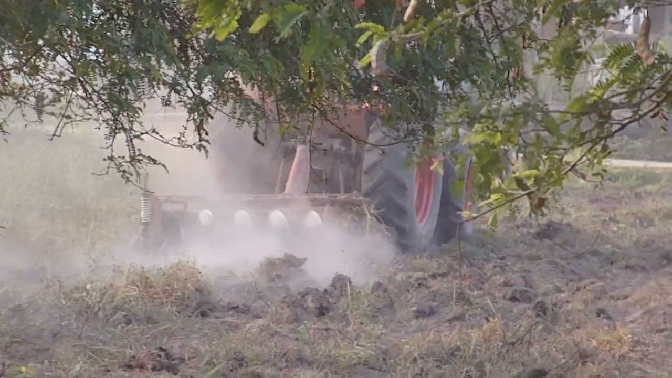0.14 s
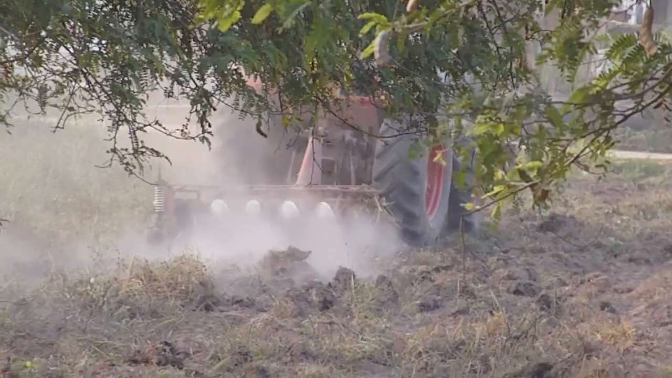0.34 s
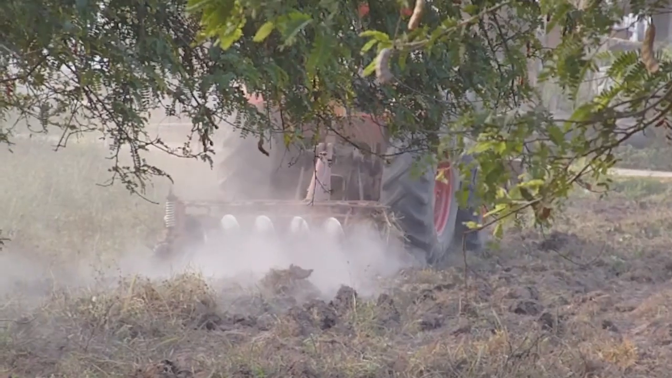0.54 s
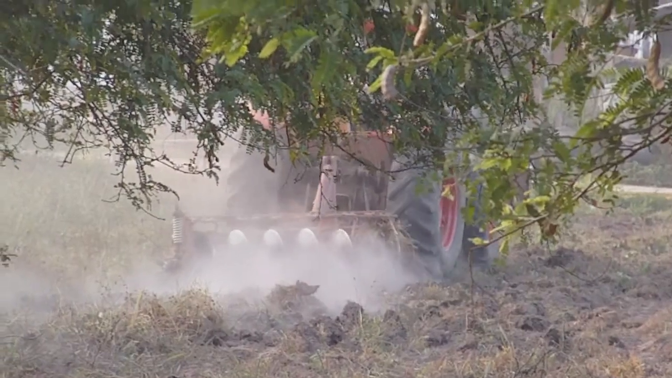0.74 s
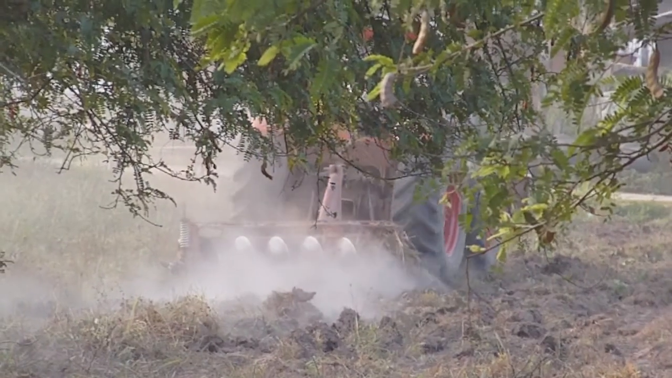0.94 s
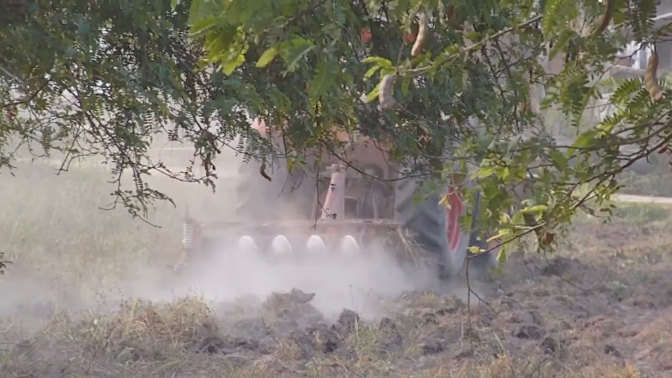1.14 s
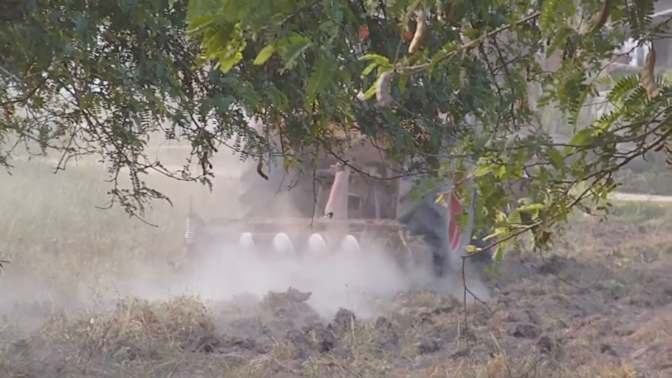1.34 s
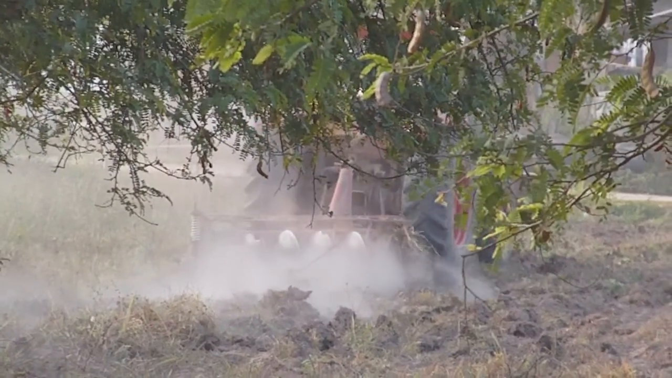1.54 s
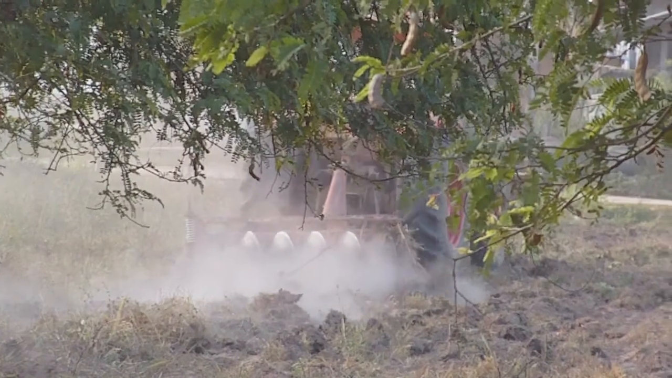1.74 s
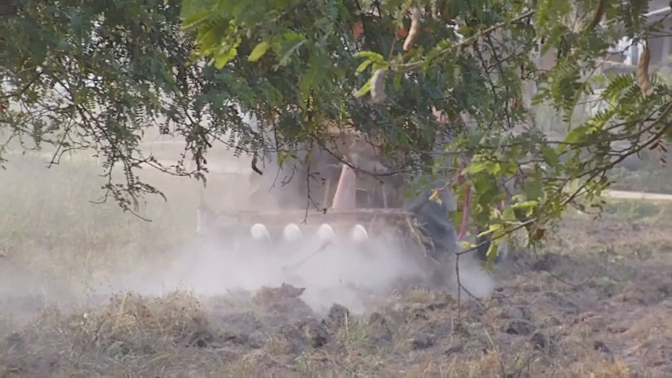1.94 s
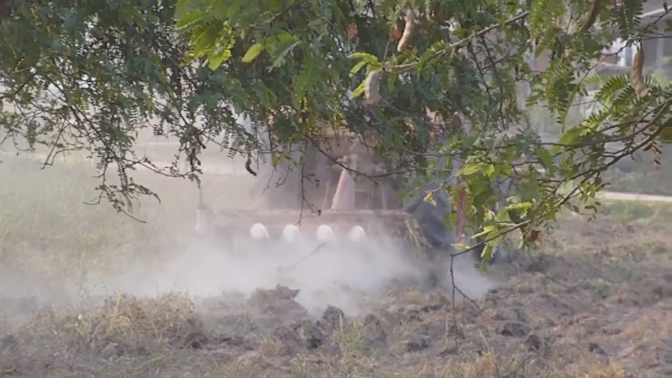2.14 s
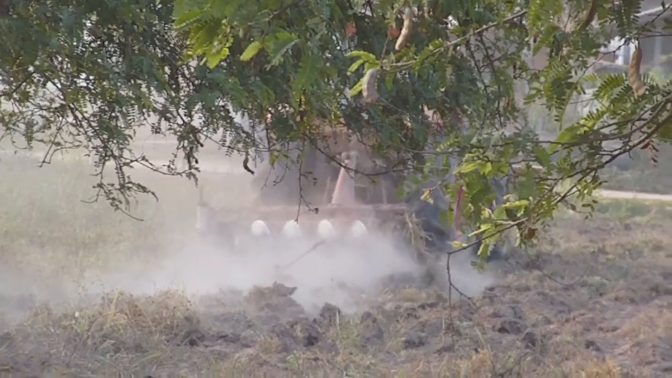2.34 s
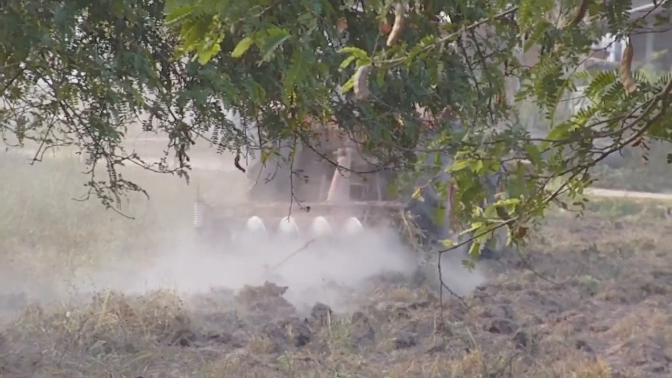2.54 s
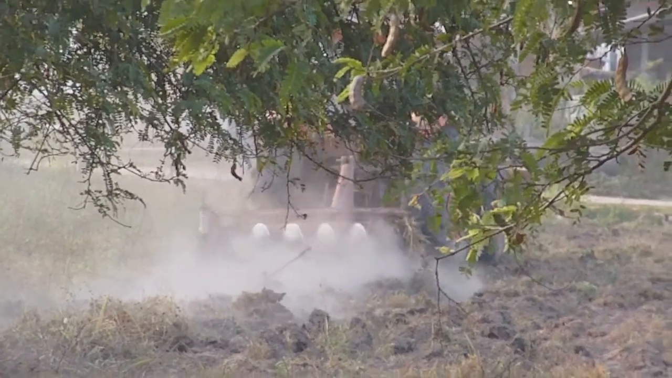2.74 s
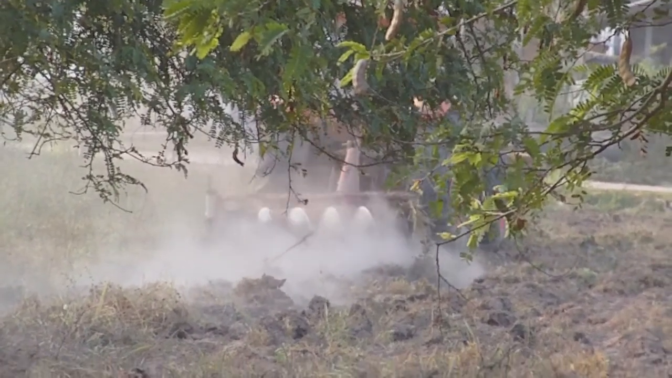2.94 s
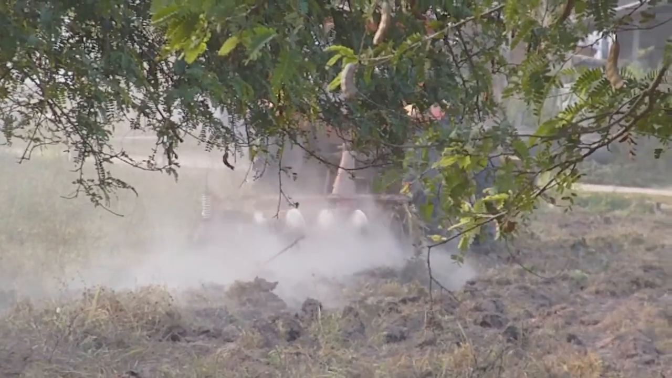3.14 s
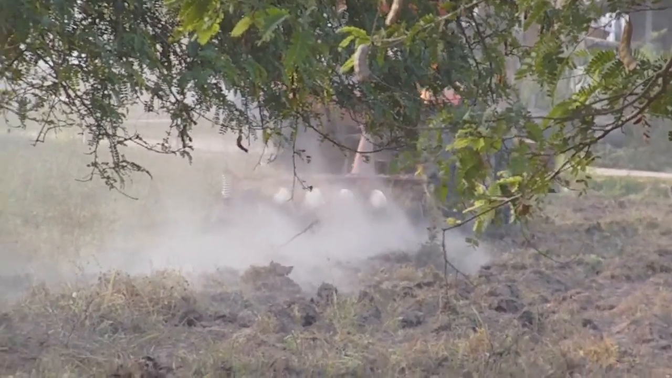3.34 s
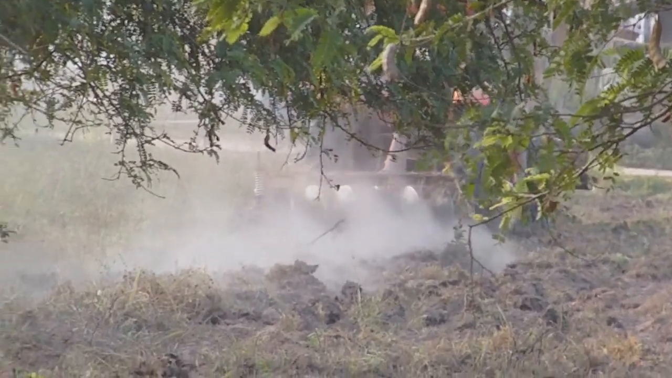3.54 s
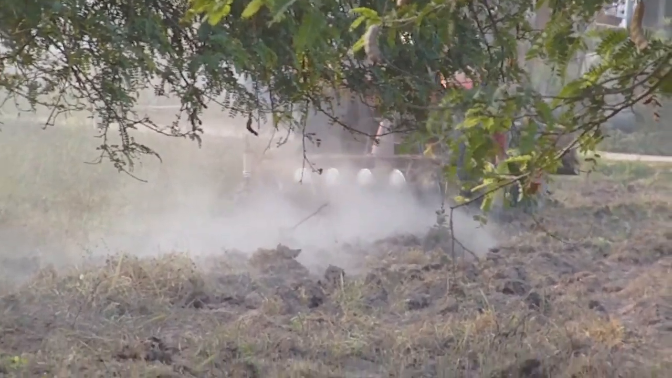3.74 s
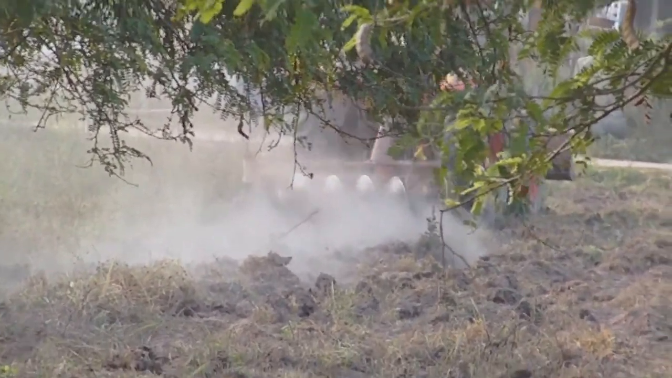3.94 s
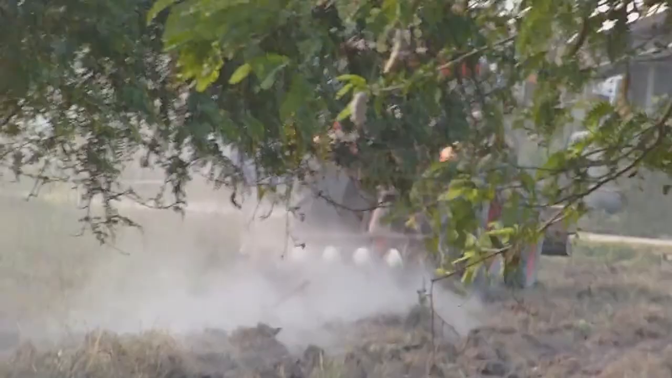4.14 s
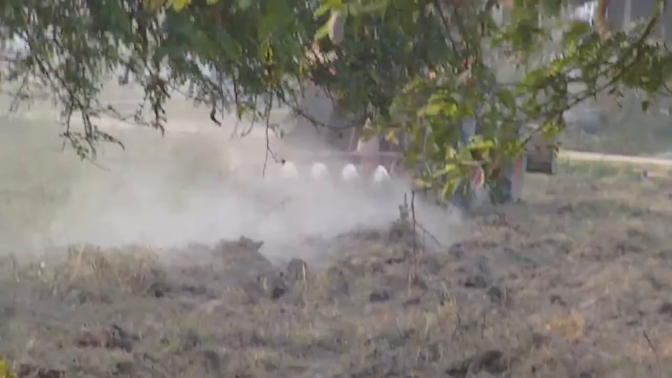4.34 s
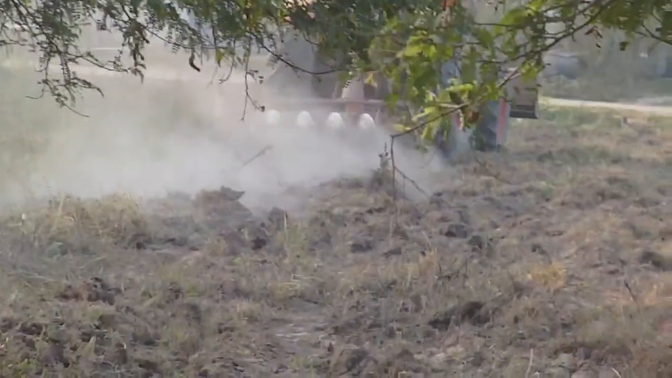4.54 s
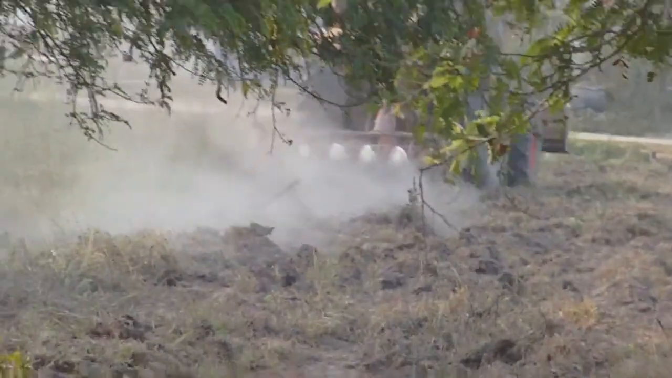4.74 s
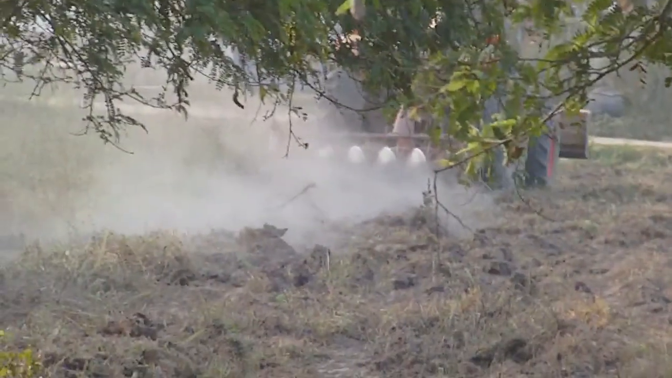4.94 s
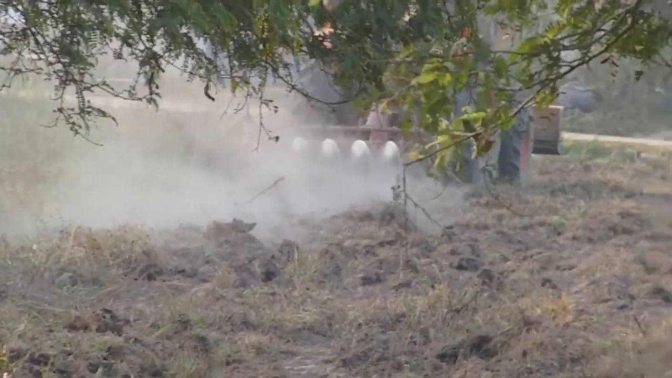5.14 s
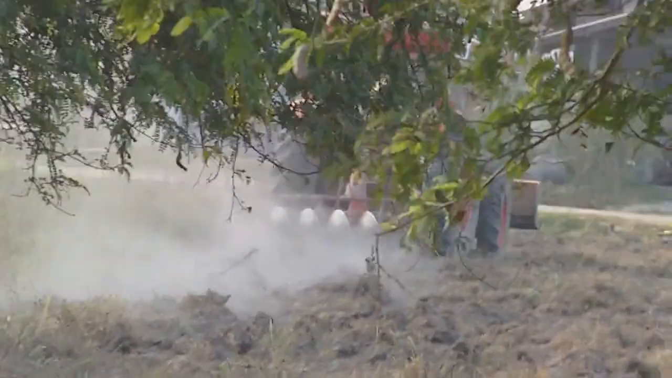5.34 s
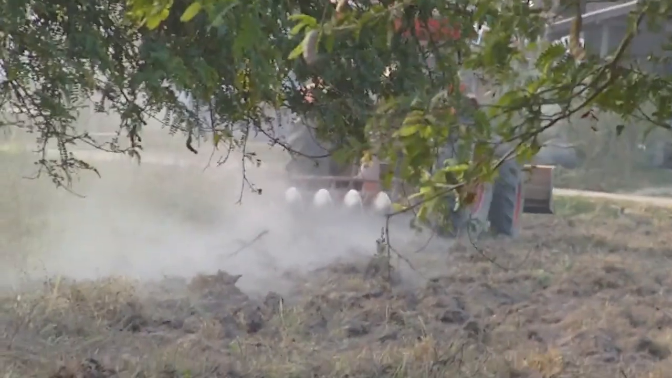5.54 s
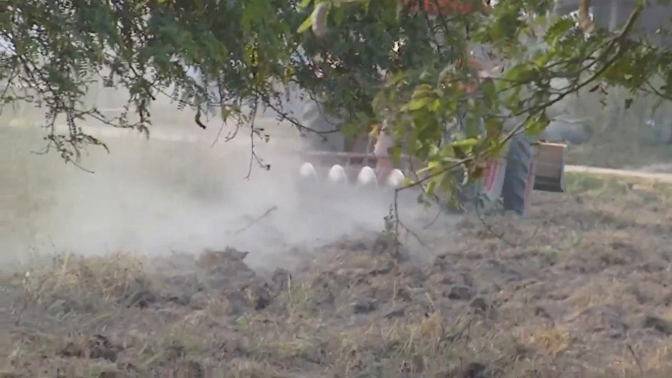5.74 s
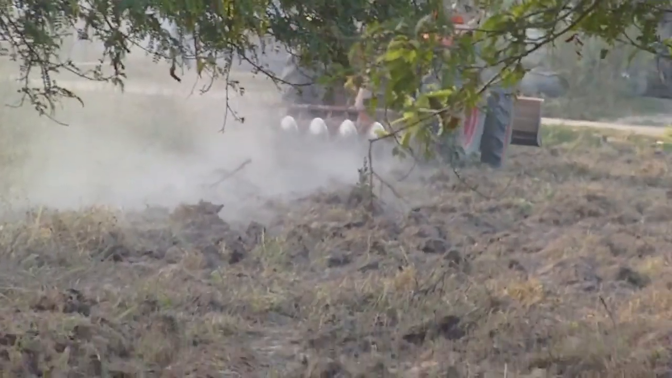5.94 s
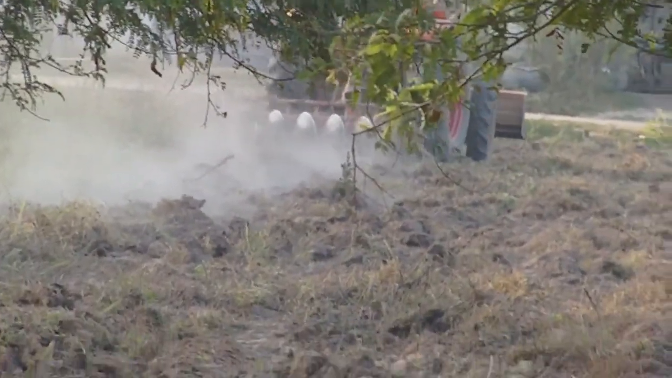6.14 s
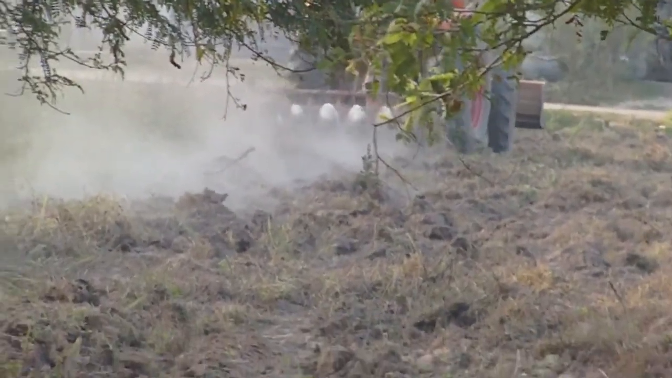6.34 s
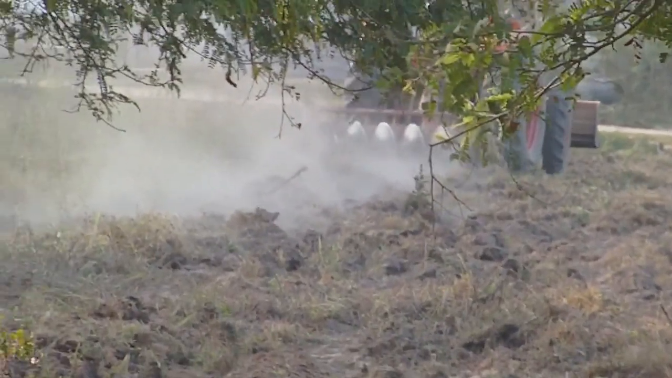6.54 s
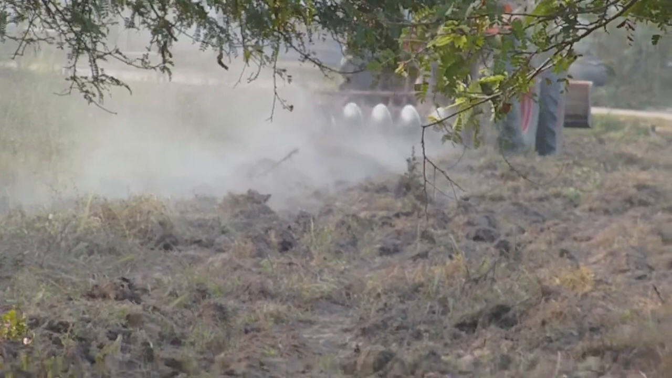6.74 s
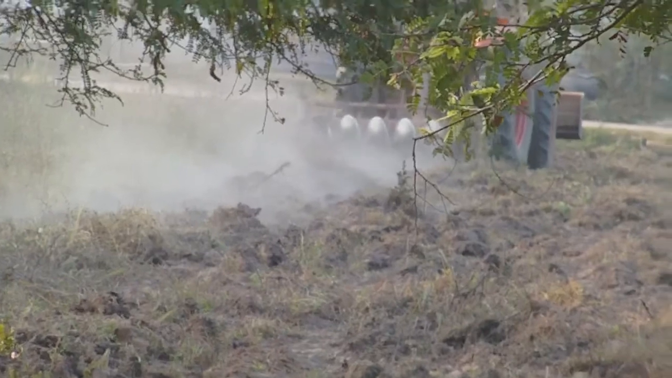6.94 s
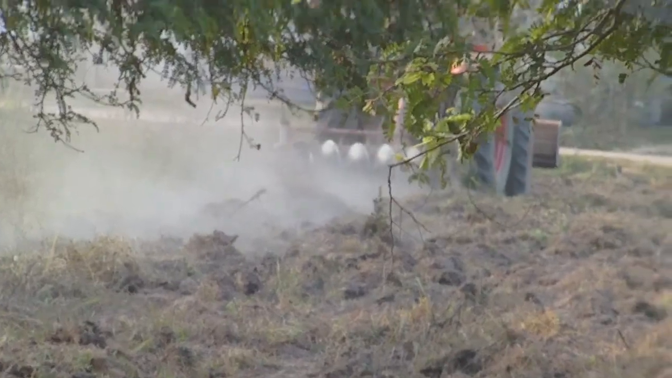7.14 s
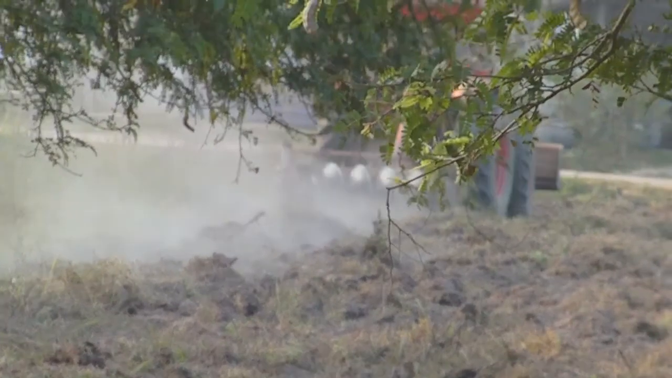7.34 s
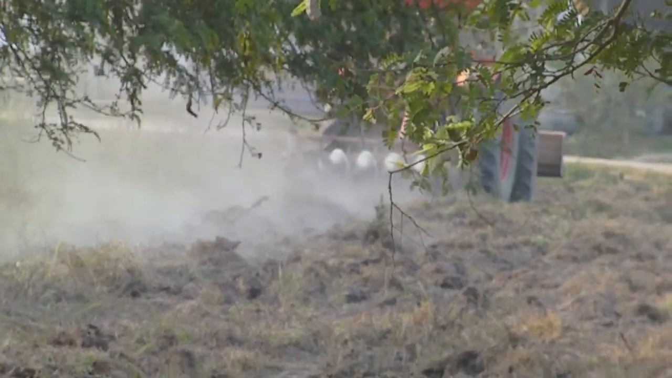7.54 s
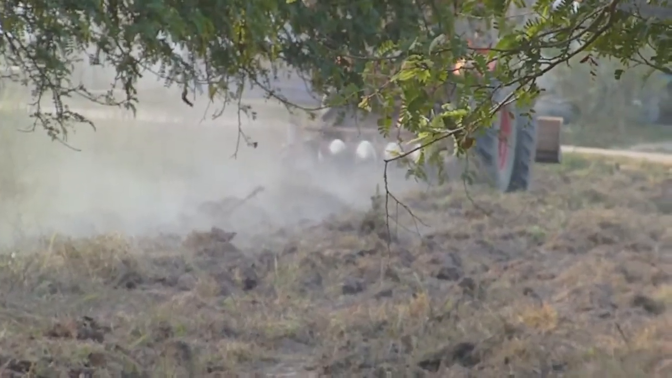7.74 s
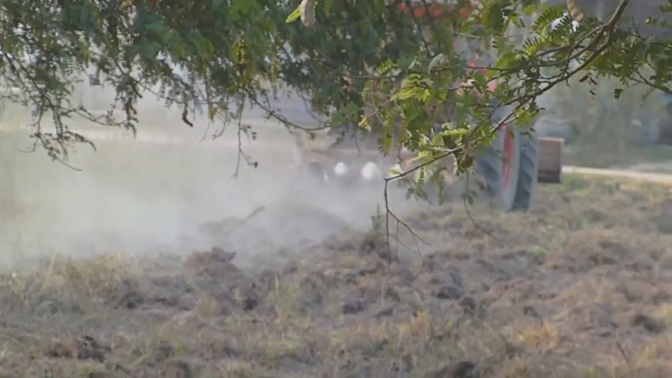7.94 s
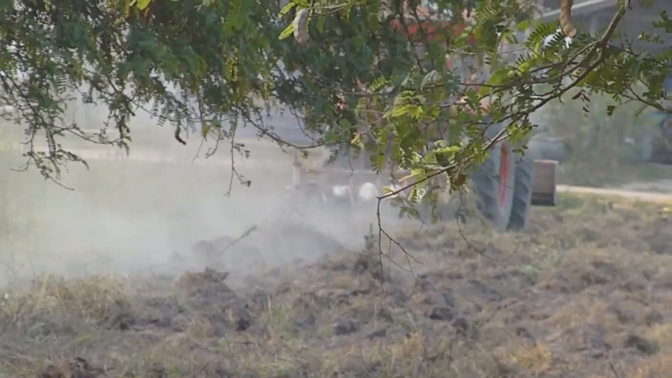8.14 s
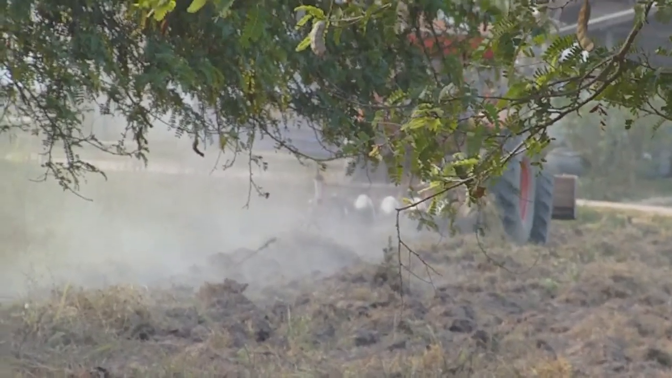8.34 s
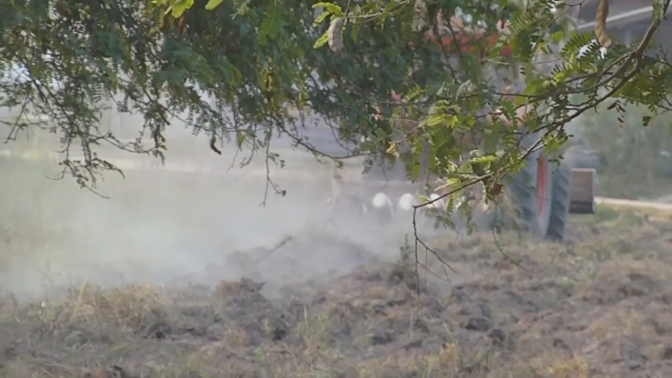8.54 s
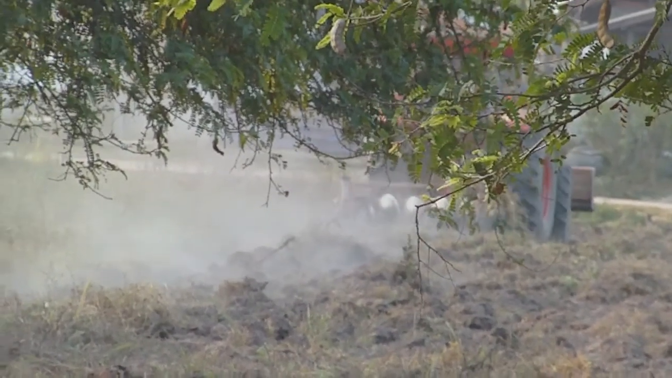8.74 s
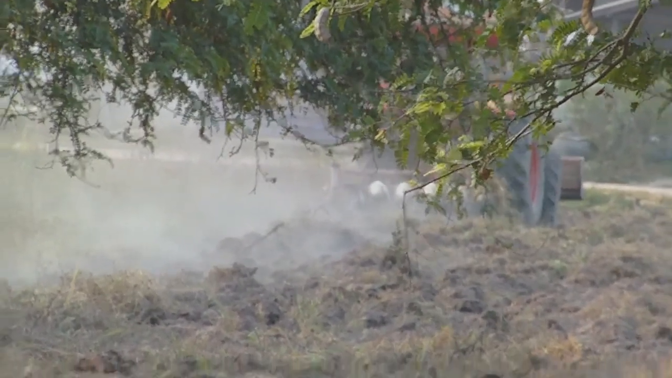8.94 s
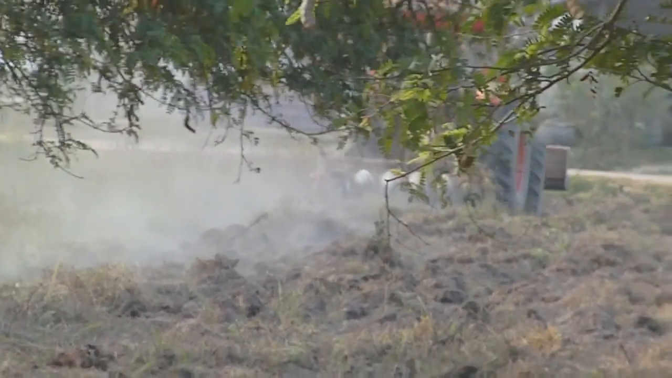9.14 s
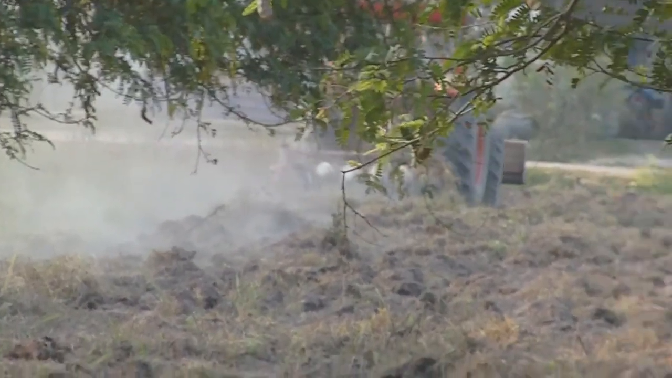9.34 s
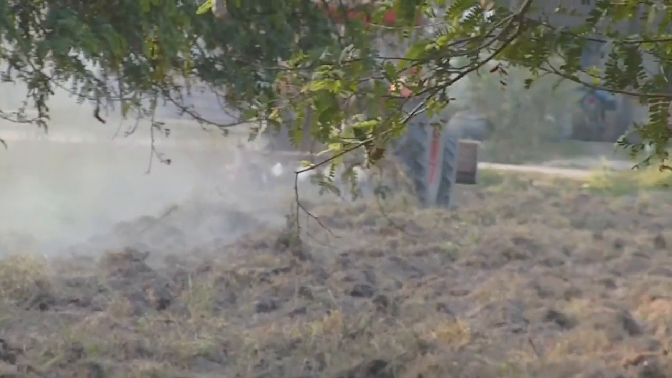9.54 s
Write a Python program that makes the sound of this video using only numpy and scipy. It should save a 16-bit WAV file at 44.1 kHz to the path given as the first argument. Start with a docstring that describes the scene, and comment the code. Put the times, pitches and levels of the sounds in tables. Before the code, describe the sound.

Outdoors in an open field, heard in mono at some distance without echo, a diesel tractor drags a disc harrow through dry, weedy soil. The sound cuts out for a tenth of a second right at the start, then returns with hard cracks and a thin, fluttering steel squeak at 0.2 s. A low engine drone with dull knocking runs throughout, surging softly about three times a second over faint ground rumble. Above it, grit crumbles and weeds crackle continuously. From about 1.9 to 5.5 s a short rasp rises again and again, five or six times a second once established. Sharp snaps cluster near 2.7 and 3.1 s and grow frequent afterwards. The ringing metallic scrape is fullest around 5.5-6.5 s, then changes tone and eases by 8-9 s as the engine grows fainter. Dry, brittle cracks at 9.1-9.4 s and a renewed scrape end it mid-work.

```python
"""Open field: a diesel tractor, some way off, drags a disc harrow through dry, weedy soil.
Fuel surges from the governor speed up the firing: exhaust cosines swell, knocking modes and shaken panels ring.
Noise grains make crumbling earth, crackling weeds and faintly ringing discs over a low noise rumble.
Splintering impulses and filtered noise make snapping stalks and clods; a gliding sine squeaks once.
For a few seconds gliding noise bands make a rising rasp that comes round with the turning discs."""
import sys
import numpy as np
from scipy import signal
from scipy.fft import rfft, irfft, next_fast_len
from scipy.io import wavfile
from scipy.ndimage import uniform_filter1d, map_coordinates

SR = 44100
rng = np.random.default_rng(int(sys.argv[2]) if len(sys.argv) > 2 else 0)


def unload_wav(signal):
    """Save mono or channel-first audio to the path in sys.argv[1] as 16-bit WAV at rate SR, clipped to [-1, 1]."""
    wavfile.write(
        sys.argv[1],
        SR,
        np.round(np.clip(np.atleast_2d(signal).T, -1, 1) * 32767).astype(np.int16),
    )


N = 427769
TOP_HZ = 7200  # upper band limit

# soil against discs, before layer trims: (time [s], crumbling [dB], crackle [dB], tumbling earth [dB])
SOIL = [(0.25, -33, -39, -37.5), (0.33, -35, -41.5, -40), (1.01, -35, -42, -41), (1.41, -33, -38.5, -39),
        (2.14, -34.5, -39.5, -41), (2.51, -32.5, -38.5, -40), (3.01, -33.5, -36.5, -41),
        (3.72, -30, -40, -38.5), (4.12, -31, -35.5, -42.5), (4.43, -31, -40, -43), (4.8, -30, -33, -43),
        (5.07, -30.5, -36, -38.5), (5.51, -28.5, -37.5, -41.5), (6.12, -24.5, -34.5, -39.5),
        (7.01, -28, -35, -39.5), (7.59, -29.5, -33, -41), (8.07, -33.5, -37.5, -40.5),
        (8.41, -31.5, -33, -41), (8.64, -36, -39, -40.5), (8.85, -36, -38.5, -43.5),
        (8.99, -34.5, -38.5, -43), (9.51, -30.5, -34.5, -37.5), (9.7, -30.5, -38, -41.5)]
# as the harrow swings into view: (time [s], steel ring [dB], plain crumbling [dB], engine panels [dB])
ASPECT = [(0, -12.5, -4.5, -39), (3, -6, -3, -39), (5, -0.5, -3.5, -39.5), (6.5, -4.5, -6, -42.5),
          (8.4, -2, -1, -47), (9.7, -3, -6.5, -44.5)]


def amp(db):
    """Decibels to gain."""
    return 10 ** (np.asarray(db) / 20)


def unit(x):
    """Scale to rms 1."""
    return x / np.sqrt(np.mean(x ** 2) + 1e-20)


def curves(rows):
    """One value per sample for each column after the time."""
    s, *cols = np.transpose(rows)
    return [np.interp(np.arange(N) / SR, s, c) for c in cols]


def swells(rows):
    """Sum of Gaussian humps: (time [s], height, half length [s])."""
    t = np.arange(N) / SR
    return sum(height * np.exp(-.5 * ((t - s) / half) ** 2) for s, height, half in rows)


def wobble(knots_per_s):
    """Smooth random curve through normal knots."""
    knots = rng.standard_normal(4096)
    return map_coordinates(knots, [np.arange(N) * knots_per_s / SR], mode="mirror")


def filtered(x, response):
    """x times a response of frequency."""
    m = next_fast_len(len(x) + 8192)
    spectrum = rfft(x, m) * response(np.fft.rfftfreq(m, 1 / SR))
    return irfft(spectrum, m)[:len(x)]


def coloured(x, points):
    """x shaped by (frequency [Hz], level [dB]) points, at rms 1."""
    f, db = np.transpose(points)
    return unit(filtered(x, lambda hz: amp(np.interp(np.log(hz + 1), np.log(f), db))))


def resonate(x, modes):
    """x through (centre [Hz], width [Hz], level [dB]) resonances, at rms 1."""
    def response(f):
        return sum(amp(db) * 1j * f * w / (c * c - f * f + 1j * f * w) for c, w, db in modes)
    return unit(filtered(x, response))


def add(track, s, sound):
    """Mix a sound in at time s."""
    part = track[max(round(s * SR), 0):][:len(sound)]
    part += sound[:len(part)]


def grains(per_second, spread_db, energy_life_s):
    """Tiny fractures at random moments: decaying noise bursts of scattered strength, at rms 1."""
    chance = rng.random(N)
    size = np.minimum(rng.standard_exponential(N), np.pi)
    energy = (chance < per_second / SR) * amp(spread_db * size) ** 2
    fading = signal.lfilter([1], [1, -np.exp(-1 / (energy_life_s * SR))], energy)
    return unit(np.sqrt(np.abs(fading)) * rng.standard_normal(N))


def hollowed(x):
    """Take out the narrow bands that the harrow radiates poorly."""
    # (centre [Hz], width [Hz], level [dB])
    hollows = [(932, 22, -11.5), (1165, 22, -4.5), (1496, 38, -2.5), (1764, 15, -1), (2190, 25, -4),
               (2880, 40, -2)]

    def response(f):
        return amp(sum(db * np.exp(-.5 * ((f - hz) / width) ** 2) for hz, width, db in hollows))
    return filtered(x, response)


def disc_ring(x, shift_db=2.1, shifts_per_s=7, drift_s=.0007):
    """x rings the discs; modes trade strength and drift in pitch as they roll and the harrow turns away."""
    # steel disc modes: (centre [Hz], width [Hz], level [dB], gain at full turn [dB])
    disc_modes = [(747, 21, -7, -4.5), (927, 100, -9.5, 1.5), (1360, 220, -24.5, -10.5), (1620, 24, 0, 4.5),
                  (1805, 25, 0, -8), (1908, 49, 3.5, -0.5), (2098, 28, -2, 8), (2374, 32, -0.5, -1),
                  (2457, 46, 2, -3.5), (2628, 33, 2, 5), (2705, 63, -4, 0), (2970, 25, 1, 2),
                  (3230, 34, -10, -5.5), (3340, 34, -1, 2.5), (3565, 28, 1, -10), (3870, 30, -0.5, -3),
                  (4480, 11, -3, 2), (5250, 35, -6, -6), (6070, 55, -1, 5.5), (6224, 38, -19, 7)]
    # how far the harrow has turned away: (time [s], share [0-1])
    turn_curve = [(6.6, 0), (7.6, 0.76)]
    turned, = curves(turn_curve)
    t, out = np.arange(N) / SR, np.zeros(N)
    knots = np.arange(0, N / SR + 1, 1 / shifts_per_s)
    for hz, width, db, turn_db in disc_modes:
        shift = np.interp(t, knots, rng.standard_normal(512)[:len(knots)])
        level_db = db + turn_db * turned + shift_db * shift
        out += amp(level_db) * signal.lfilter(*signal.iirpeak(hz, hz / width, SR), x)
    # a wandering delay bends the pitch
    return unit(map_coordinates(out, [(t + drift_s * wobble(shifts_per_s)) * SR]))


def rumble(mean_db=-49.5, max_swing_db=3):
    """Low noise of tyres and frame rolling over rough ground, swelling as the frame jolts over ridges."""
    # (frequency [Hz], level [dB])
    ground_spectrum = [(10, -20), (19, -4.5), (24, 3.5), (30, 1), (50, -8), (70, 2.5), (110, -5),
                       (160, -13), (300, -35.5), (1000, -80)]
    # jolts: (time [s], rise over the rumble [dB], half length [s])
    jolt_humps = [(1.06, 8, 0.064), (6.76, 6, 0.034)]
    level_db = mean_db + max_swing_db * np.tanh(wobble(7)) + swells(jolt_humps)
    return amp(level_db) * coloured(rng.standard_normal(N), ground_spectrum)


def soil():
    """Earth crumbles in clumps; grit rings the discs, dry weeds crackle and turned clods thud down."""
    # spectra of crumbling, crackle and tumbling earth: (frequency [Hz], level [dB])
    crumble_spectrum = [(500, -27.5), (1000, -15.5), (1500, -2), (2500, 0), (3600, 1), (4400, -6.5),
                        (5500, -7), (8000, -54)]
    crackle_spectrum = [(2000, -15.5), (3800, 2), (4700, 5.5), (5600, 8), (6400, 9), (6900, 2), (7500, -36)]
    earth_spectrum = [(100, -3.5), (190, -15.5), (260, -3), (330, 1.5), (390, -7.5), (600, 1.5), (900, 2.5),
                      (1300, 5), (2200, -22.5), (5000, -39)]
    # discs bite into heaps of clods: (time [s], more crumbling [dB], half length [s])
    heap_humps = [(5.68, 2.5, 0.032), (6.18, 2, 0.046), (6.53, 3.5, 0.034), (8.53, 2.5, 0.037)]
    crumble_db, crackle_db, earth_db = curves(SOIL)
    crumble_db = crumble_db + swells(heap_humps)
    ring_db, plain_db, _ = curves(ASPECT)
    clumps_db = 0.8 * wobble(24) + 0.4 * wobble(70)

    grit = grains(per_second=600, spread_db=4.2, energy_life_s=0.0013) + 0.8 * rng.standard_normal(N)
    crumble = amp(crumble_db + plain_db) * coloured(grit, crumble_spectrum)

    clods = grains(per_second=70, spread_db=2.5, energy_life_s=0.005)
    fine_grit = grains(per_second=690, spread_db=1.5, energy_life_s=0.0015)
    steel = amp(crumble_db + ring_db) * disc_ring(clods + 1.1 * fine_grit)

    weeds = grains(per_second=1200, spread_db=-4.5, energy_life_s=0.0015) + 0.37 * grit
    crackle = amp(crackle_db - 2.5) * coloured(weeds, crackle_spectrum)

    tumbling = grains(per_second=500, spread_db=-1.5, energy_life_s=0.0018)
    earth = amp(earth_db + 2.0) * coloured(tumbling, earth_spectrum)

    falls = grains(per_second=54, spread_db=-0.5, energy_life_s=0.0038)
    thuds = amp(crumble_db - 28.0) * resonate(falls, [(238, 60, 0)])
    return hollowed(amp(clumps_db) * (crumble + steel + crackle) + earth + thuds)


def twigs(per_s=2, over_crackle_db=3.5, crack_over_crumbs_db=-1, centre_hz=4200, t60_s=.034,
          scatter_db=2, scatter_octaves=.35, width_octaves=.9):
    """Rows of lesser snaps at random moments, their level following the crackle."""
    crackle_db = curves(SOIL)[1]
    draws = rng.uniform(-0.91, 1, (200, 3))[:int(per_s * N / SR)]
    rows = []
    for when, size, pitch in draws:
        at = int((when + 1) / 2 * N)
        db = crackle_db[at] + over_crackle_db + scatter_db * size
        hz = centre_hz * 2 ** (scatter_octaves * pitch)
        rows.append((at / SR, db + crack_over_crumbs_db, db, hz, t60_s, width_octaves))
    return rows


def splinters(length, t60, spacing_s, loss_db_per_t60=130, count=4):
    """One break: a first fracture and weaker ones hard on its heels; brittle pieces stop sooner."""
    moments = np.cumsum(rng.uniform(.5, 2, count)) * spacing_s
    sizes = amp(-loss_db_per_t60 * moments / t60) * rng.choice([-1, 1], count)
    return np.bincount(np.round(moments * SR).astype(int), sizes, length)


def snaps(give=.02, splinter_s=.0007, trickle_db=-17):
    """Each stalk or clod breaks with a splintering crack and a trickle of crumbs, which ring the discs."""
    # loudest breaks: (time [s], crack peak [dB], crumbs [dB], centre [Hz], t60 [s], width [octaves])
    loud_snaps = [(0.1508, -4, -16.5, 3550, 0.011, .8), (0.157, -7, -7.5, 3110, 0.041, 0.78),
                  (.2, -17, -6, 4030, 0.031, 0.87), (.634, -18, -22, 3870, 0.024, 0.94),
                  (.675, -22, -26.5, 2620, .025, .8), (1.046, -23, -25, 5090, 0.095, 0.65),
                  (2.7018, -10, -7, 2630, 0.05, 0.98), (2.722, -25, -17.5, 3420, 0.14, 1),
                  (2.7637, -13, -8.5, 6050, 0.032, 0.47), (2.772, -26, -16, 1646, 0.041, 0.11),
                  (3.087, -7.5, -21, 5540, 0.036, 1.7), (3.107, -16, -26, 5640, .015, 0.55),
                  (3.123, -7.5, -18, 5210, 0.039, 2.8), (3.1858, -8, -10.5, 4750, 0.029, 1.3),
                  (3.257, -19, -20, 5530, 0.029, 0.74), (3.337, -20, -17.5, 5600, 0.03, 0.13),
                  (3.36, -18, -22, 5720, .025, 0.24), (3.522, -22, -15.5, 2450, .033, 1.2),
                  (3.5716, -14.5, -15.5, 3440, 0.027, 0.73), (3.712, -35, -25.5, 1900, 0.15, 0.17),
                  (3.8308, -18, -23.5, 3700, .025, 0.59), (3.887, -15, -20.5, 3350, 0.019, 0.92),
                  (4.0262, -11, -13.5, 3940, .02, 0.8), (4.1776, -18, -21, 3670, .018, 1),
                  (4.4053, -30, -21, 5950, 0.23, 0.13), (4.6548, -9, -15, 3860, 0.033, 1.4),
                  (4.9789, -17, -4, 2700, 0.05, 0.94), (4.992, -26, -14.5, 1920, .035, 0.67),
                  (5.2157, -14, -16, 2990, 0.026, 0.65), (5.283, -20, -7.5, 3530, 0.036, 2),
                  (5.298, -15, -9, 3070, 0.079, 1.4), (5.305, -24, -23, 2300, 0.061, 0.16),
                  (5.4175, -11, -9, 3970, 0.062, 0.91), (5.8158, -15, -13.5, 4390, 0.09, 1.8),
                  (5.836, -12, -18.5, 3220, 0.056, 0.91), (5.979, -15, -15.5, 3780, 0.12, 0.9),
                  (6.0262, -17, -15.5, 2840, 0.074, 0.8), (6.099, -10, -20.5, 2440, 0.05, 0.76),
                  (6.147, -17, -16, 3360, 0.07, 0.69), (6.214, -21, -22.5, 3530, 0.14, .3),
                  (6.625, -14, -22.5, 2250, 0.054, 0.6), (6.663, -13, -18.5, 5800, 0.025, 0.73),
                  (6.673, -14, -21.5, 3280, 0.034, .8), (6.696, -19, -12.5, 6000, 0.012, 0.34),
                  (6.72, -21, -18, 1760, 0.24, 1.6), (6.745, -23, -23, 850, 0.077, .8),
                  (6.781, -22, -18, 3200, 0.023, 1), (6.9229, -22, -15, 2950, 0.08, 1.2),
                  (7.073, -15, -23.5, 2820, 0.04, 1.2), (7.161, -26, -26, 2390, 0.075, 0.63),
                  (7.3822, -14, -15.5, 4220, 0.081, 1), (7.402, -19, -12.5, 2860, 0.058, 0.32),
                  (7.4503, -14, -17, 2350, 0.055, 0.49), (7.639, -26, -21, 1890, 0.027, 0.59),
                  (7.7671, -12.5, -17.5, 4000, 0.094, 1.6), (7.8283, -19, -11, 3030, 0.061, 0.83),
                  (7.84, -16, -15.5, 2920, 0.074, 1), (7.8806, -24, -13.5, 3330, .03, 1.1),
                  (7.998, -19, -20.5, 2860, 0.032, 0.89), (8.145, -27, -20, 2650, 0.11, 0.46),
                  (8.231, -13, -16, 3600, 0.05, .8), (8.318, -13, -10.5, 4210, 0.12, 1.1),
                  (8.392, -15, -20, 2670, 0.015, .7), (8.489, -24, -23, 3200, 0.016, 0.81),
                  (8.557, -16, -17, 5330, 0.034, 1.1), (8.569, -11, -15.5, 4230, 0.064, 0.93),
                  (8.696, -9.5, -20, 3270, 0.056, 1.6), (9.1009, -6.5, -12.5, 1110, 0.01, 1.5),
                  (9.2455, -6.5, -26, 4000, .008, 0.37), (9.313, -13, -14, 4220, 0.023, 1.4),
                  (9.35, -24, -17, 2890, 0.058, .6), (9.3728, -11, -12, 4560, 0.0077, 1.5),
                  (9.425, -32, -20, 1100, 0.14, 1.6), (9.441, -29, -22.5, 720, 0.077, 0.41),
                  (9.496, -30, -16.5, 1250, 0.047, 0.52), (9.581, -20, -25.5, 6000, .012, .25),
                  (9.6767, -11, -11.5, 5560, 0.017, 0.48)]
    cracks, crumbs, t = np.zeros(N), np.zeros(N), np.arange(SR // 4) / SR
    for s, crack_db, crumbs_db, hz, t60, octaves in loud_snaps + twigs():
        def band(f):
            bell = np.exp(-.5 * (np.log2((f + 1) / hz) / octaves) ** 2)
            # small pieces radiate little below their own pitch
            low_cut = 1 + (hz * 2 ** (-1.3 * octaves) / (f + 1)) ** 6
            return bell / low_cut * (f < TOP_HZ)

        crack = filtered(splinters(len(t), t60, splinter_s), band)
        add(cracks, s - splinter_s, amp(crack_db) * crack / np.abs(crack).max())
        noise = np.tanh(unit(filtered(rng.standard_normal(len(t)), band)) / 2)
        # long breaks give way gradually, short ones at once
        onset = 1 - np.exp(-t / (give * t60))
        fall = amp(-60 * t / t60) + amp(trickle_db) * amp(-60 * t / (4 * t60))
        add(crumbs, s, amp(crumbs_db) * onset * fall * noise)
    ringing = amp(-3.5) * np.std(crumbs) * disc_ring(crumbs)
    return cracks + hollowed(crumbs) + ringing


def squeak():
    """One thin squeak of steel: a fluttering sine that mostly rises."""
    # (time [s], pitch [Hz], level [dB])
    squeak_path = [(.165, 5030, -100), (.175, 5040, -35), (.19, 5080, -36), (.205, 5330, -36),
                   (.228, 5170, -33), (.245, 5300, -35), (.258, 5450, -36), (.27, 6050, -40),
                   (.278, 5480, -41), (.286, 5300, -41), (.295, 5300, -100)]
    hz, db = curves(squeak_path)
    return amp(db) * np.sin(2 * np.pi * np.cumsum(hz + 25 * wobble(290)) / SR)


def rasps(top_hz=3540, glide_per_s=16, disc_note_hz=3600, rise_s=.027, fall_s=.016, width_hz=170,
          grit_hz=580, waver=.075, ring=.6, ring_s=.02, spray=.7, spray_hz=4200, stutter_db=2.3):
    """A gritty, stuttering scrape climbs, catches a disc's note and lets go in a spray of grit."""
    # (time of the height [s], level [dB])
    rasp_times = [(1.875, -36), (2.299, -36.5), (2.595, -35), (2.92, -32.5), (3.089, -33.5), (3.272, -29),
                  (3.425, -31), (3.619, -29), (3.78, -31), (3.969, -29.5), (4.114, -32.5), (4.315, -30.5),
                  (4.489, -31.5), (4.698, -29.5), (4.868, -29.5), (5.075, -30.5), (5.244, -30),
                  (5.455, -31.5)]
    out, t = np.zeros(N), np.arange(-SR // 10, SR // 16) / SR

    def narrow(centre, width):
        noise = rng.standard_normal(len(t))
        return unit(filtered(noise, lambda f: np.exp(-((f - centre) / width) ** 2)))

    for s, db in rasp_times:
        glide = glide_per_s * rng.uniform(.6, 1.15)
        hz = top_hz * np.exp(glide * np.minimum(t, fall_s / 2) + waver * narrow(0, width_hz))
        phase = 2 * np.pi * np.cumsum(hz) / SR
        climb = narrow(0, grit_hz) * np.sin(phase) + narrow(0, grit_hz) * np.cos(phase)
        swell = np.exp(-.5 * (t / np.where(t < 0, rise_s, fall_s)) ** 2)
        caught = np.exp(-.5 * (t / ring_s) ** 2)
        top = ring * narrow(disc_note_hz, width_hz) + spray * narrow(spray_hz, 2 * grit_hz)
        stutter = unit(amp(stutter_db * narrow(0, width_hz)))
        add(out, s + t[0], amp(db) * stutter * (swell * climb + caught * top))
    return out


def governor(speed_hz_per_db=3.65, flywheel_s=.5, settle_s=.9):
    """Fuel [dB about its mean] and firing-rate swing [Hz], which lags by the flywheel and is evened out."""
    # fuel surges: (time of the height [s], strength [dB], half length [s])
    surge_humps = [(0.33, 4.5, 0.126), (0.73, 6.5, 0.094), (1.07, 6.5, 0.065), (1.37, 6.8, 0.08),
                   (1.74, 7.0, 0.098), (2.05, 7.0, 0.078), (2.43, 6.0, 0.155), (2.77, 4.5, 0.082),
                   (3.15, 5.5, 0.133), (3.6, 5.5, 0.075), (3.81, 4.5, 0.04), (4.11, 5.0, 0.124),
                   (4.53, 6.0, 0.062), (4.85, 4.5, 0.079), (5.27, 4.0, 0.17), (5.8, 5.0, 0.17),
                   (6.33, 5.0, 0.167), (6.71, 7.5, 0.043), (7.04, 5.5, 0.09), (7.44, 5.5, 0.1),
                   (7.78, 6.0, 0.085), (8.11, 3.5, 0.065), (8.44, 4.5, 0.11), (8.73, 6.5, 0.045),
                   (8.99, 8.0, 0.055), (9.215, 7.5, 0.073), (9.56, 8.0, 0.083)]
    fuel_db = swells(surge_humps)
    fuel_db = fuel_db - fuel_db.mean()
    keep = np.exp(-1 / (flywheel_s * SR))
    spin = signal.lfilter([1 - keep], [1, -keep], fuel_db)
    return fuel_db, speed_hz_per_db * (spin - uniform_filter1d(spin, int(settle_s * SR)))


def firing_bursts(firings, decay_periods, scatter_db):
    """A decaying noise burst at each firing, each of its own strength, at rms 1."""
    strength = amp(scatter_db * rng.standard_normal(1024))[firings.astype(int)]
    return unit(strength * np.exp(-(firings % 1) / decay_periods) * rng.standard_normal(N))


def panels(firings):
    """Silencer and bonnet resonate to the noise burst of each firing."""
    # (centre [Hz], width [Hz], level [dB])
    bonnet_modes = [(299, 8.9, -0.5), (454.6, 20, 1), (592, 77, -9), (782, 31, 0), (913, 10, 2.5),
                    (1435, 53, -1.5), (1646, 37, -6), (1880, 82, -7.5), (2516, 43, -8.5)]
    panels_db = curves(ASPECT)[-1]
    bursts = firing_bursts(firings, decay_periods=1.0, scatter_db=0.5)
    shaking = coloured(bursts, [(200, -15.5), (280, 6.0)])
    return amp(panels_db) * resonate(shaking, bonnet_modes)


def exhaust(firings, fuel_db, swing_hz, db_per_fuel_db=0.75, overrun_db_per_hz=1):
    """Firing-rate harmonics swell with the fuel and slacken when the engine runs too fast."""
    # (multiple of firing rate, level [dB], share of the level swing followed [0-1])
    orders = [(1, -5.5, .6), (2, -6.5, 0.6), (3, -3, 0.96), (4, -25.5, .5)]
    # as the tractor draws away, before the fuel's share: (time [s], level [dB])
    distance_levels = [(0, -37.5), (1, -43.5), (2, -37.5), (3.3, -43), (4.3, -46), (5.4, -41.5),
                       (6.5, -50.5), (7.8, -45.5), (8.6, -48), (9.2, -43.5), (9.7, -44.5)]
    level_db = curves(distance_levels)[0] + db_per_fuel_db * fuel_db - overrun_db_per_hz * swing_hz
    usual_db = level_db.mean()
    drone = np.zeros(N)
    for k, db, share in orders:
        order_db = usual_db + db + share * (level_db - usual_db) + 1.7 * wobble(23)
        drone += amp(order_db) * np.sqrt(2) * np.cos(2 * np.pi * k * firings)
    return drone


def knock(firings, rate, swell_s=0.0031, scatter_db=3.6, scatter_hz=14, rough=0.42, upper_db=-13):
    """Each firing rings the block afresh at its own strength and pitch; a higher mode rattles along."""
    # main resonance sinks as the tractor turns away: (time [s], pitch [Hz])
    pitch_path = [(0, 1137), (3, 1135), (3.8, 1096), (9.7, 1089)]
    hz, = curves(pitch_path)
    cycle, age_s = firings.astype(int), (firings % 1) / rate
    size = amp(scatter_db * np.clip(rng.standard_normal(1024), -2, 1))
    phase = 2 * np.pi * rng.random(1024)
    detune_hz = scatter_hz * rng.standard_normal(1024)

    def blow(n, t):
        envelope = size[n] * t ** 2 * np.exp(-t / swell_s)
        return envelope * np.sin(2 * np.pi * (hz + detune_hz[n]) * t + phase[n])

    # the last firing still rings under the new one
    ring = blow(cycle, age_s) + blow(cycle - 1, age_s + 1 / rate)
    clatter = resonate(firing_bursts(firings, decay_periods=0.6, scatter_db=4), [(1097, 90, 0)])
    rattle = resonate(firing_bursts(firings, decay_periods=0.18, scatter_db=6.0), [(2620, 61, 0)])
    return unit(unit(ring) + rough * clatter) + amp(upper_db) * rattle


def engine(knock_db=-40.5, knock_db_per_fuel_db=1.54):
    """Diesel firing at the governed speed drives exhaust, combustion knock and panels."""
    # held engine speed: (time [s], firing rate [Hz])
    held_speed = [(0, 36.3), (2.4, 35.1), (4.1, 37.0), (5.1, 36.3), (6.2, 37.0), (8.3, 36.9), (9.7, 35.8)]
    fuel_db, swing_hz = governor()
    rate = curves(held_speed)[0] + swing_hz
    firings = np.cumsum(rate) / SR
    knocking = amp(knock_db + knock_db_per_fuel_db * fuel_db) * knock(firings, rate)
    return exhaust(firings, fuel_db, swing_hz) + knocking + panels(firings)


def scene():
    """Tractor and harrow in the open, heard in mono."""
    return (rumble() + soil() + snaps() + squeak() + rasps() + engine())[None]


def record(dry):
    """The sound drops out for a moment near the start; a steep low-pass sets the band limit."""
    # dropout: (start [s], end [s])
    dropout = (.017, .117)
    t = np.arange(N) / SR
    running = dry[0] * ((t < dropout[0]) | (t > dropout[1]))
    return filtered(running, lambda hz: 1 / np.sqrt(1 + (hz / TOP_HZ) ** 140))[None]


dry = scene()
out = record(dry)
unload_wav(out)
```